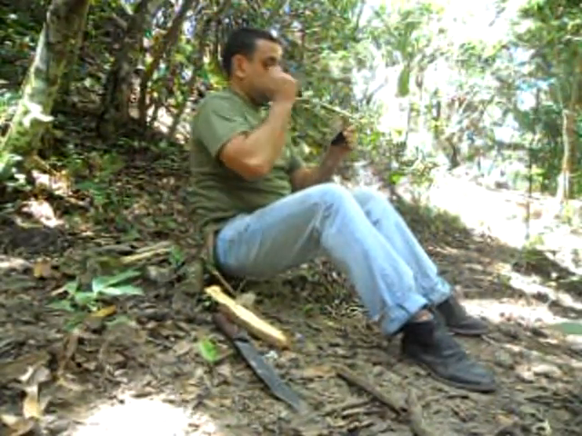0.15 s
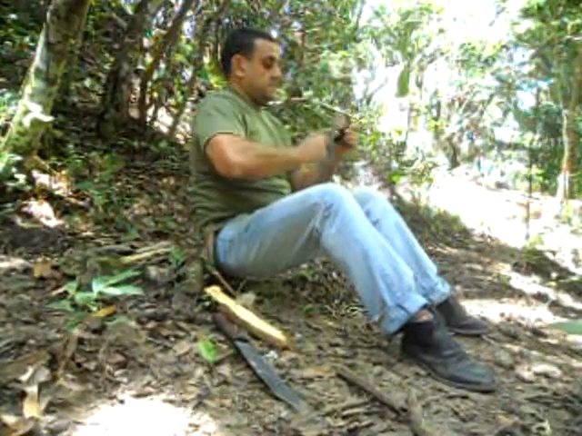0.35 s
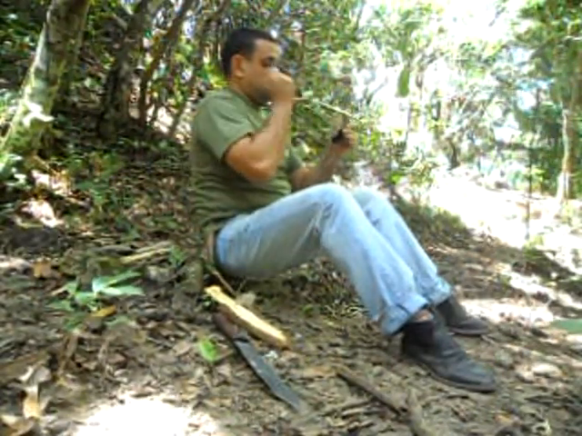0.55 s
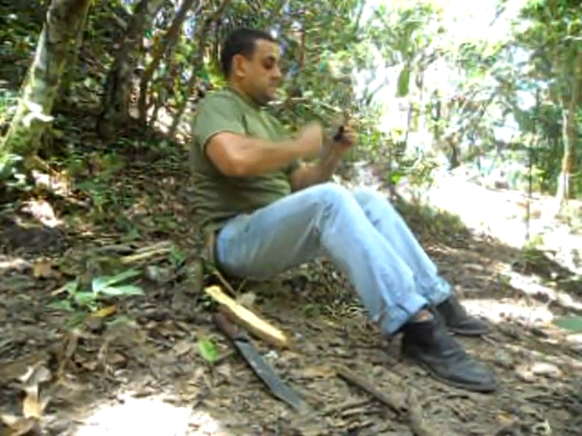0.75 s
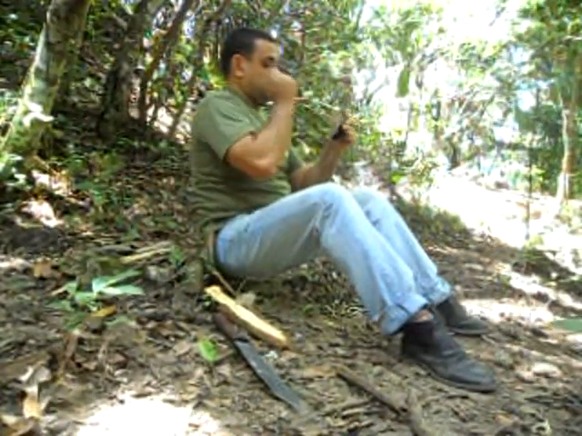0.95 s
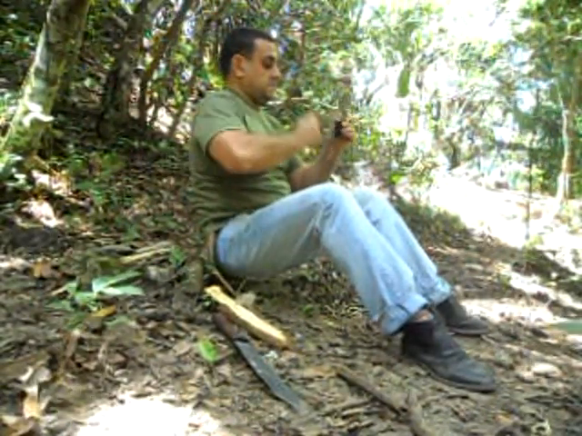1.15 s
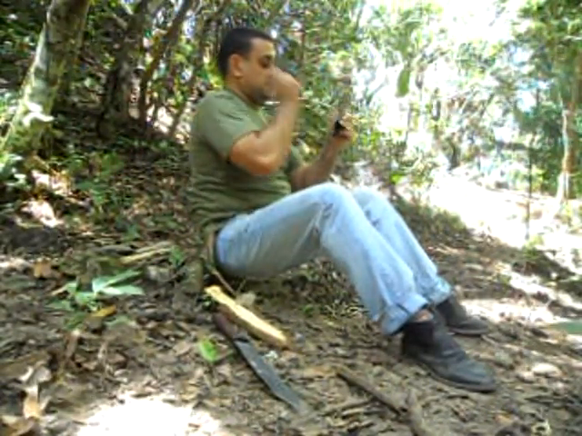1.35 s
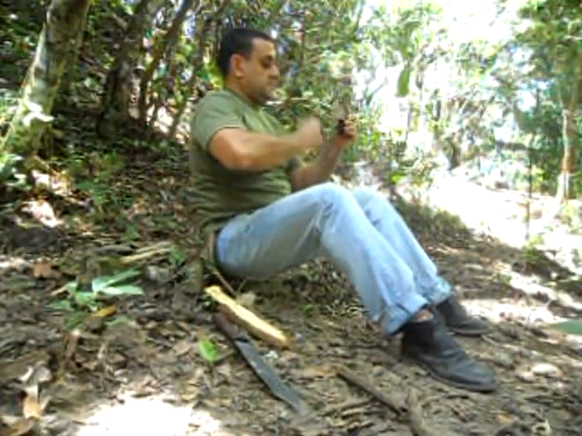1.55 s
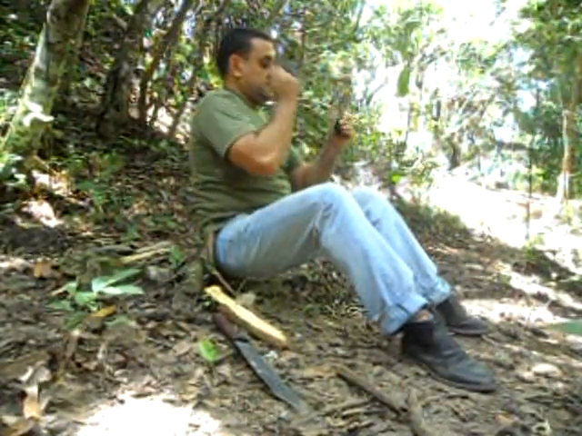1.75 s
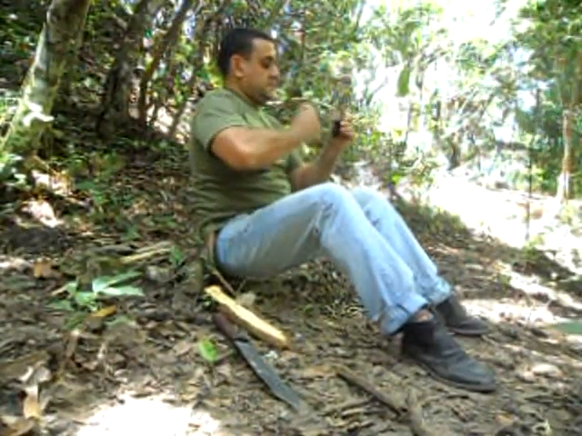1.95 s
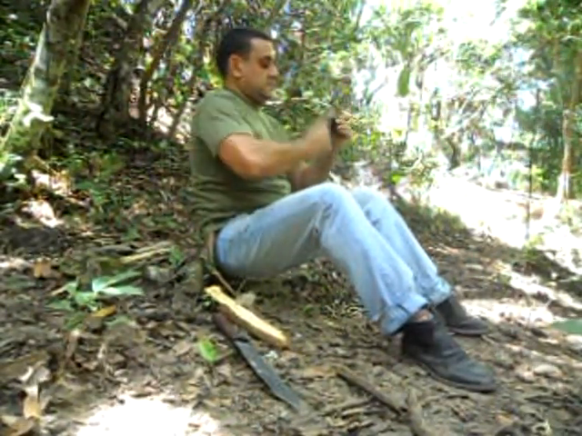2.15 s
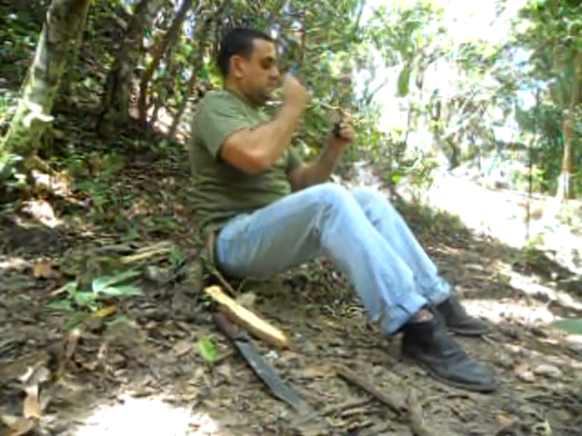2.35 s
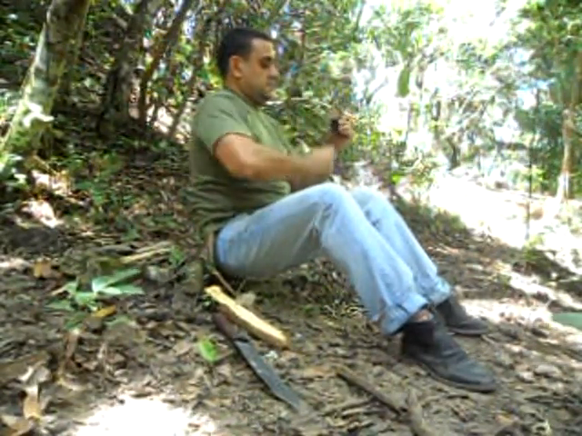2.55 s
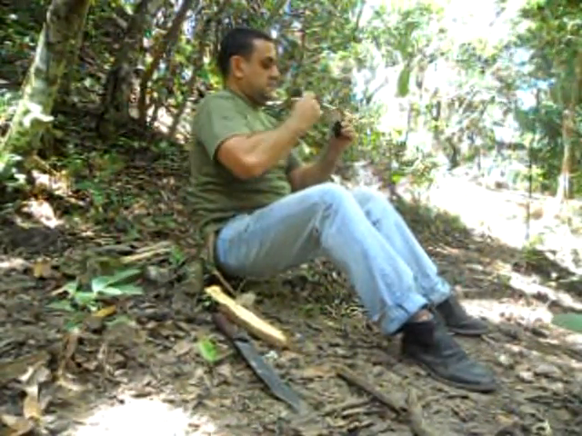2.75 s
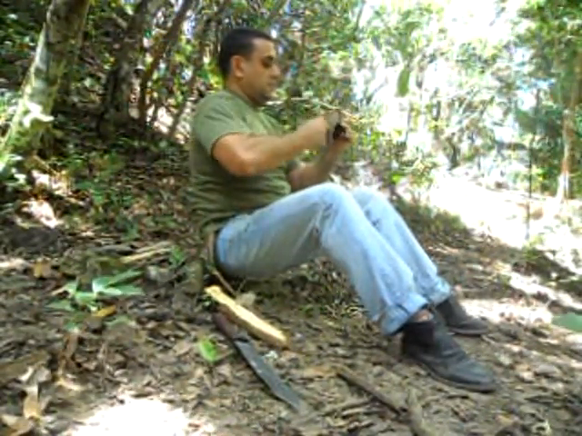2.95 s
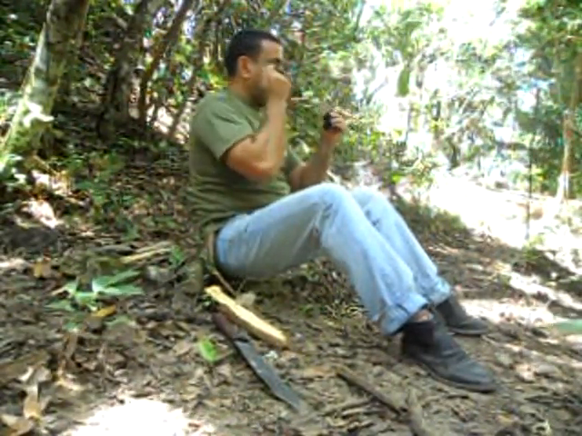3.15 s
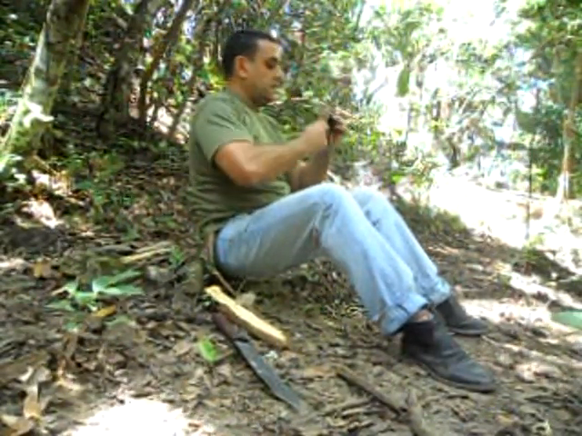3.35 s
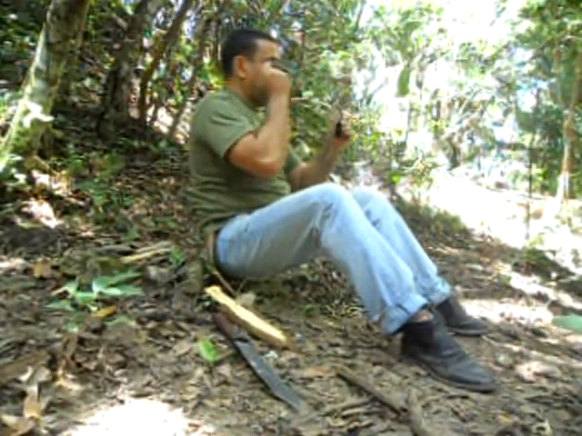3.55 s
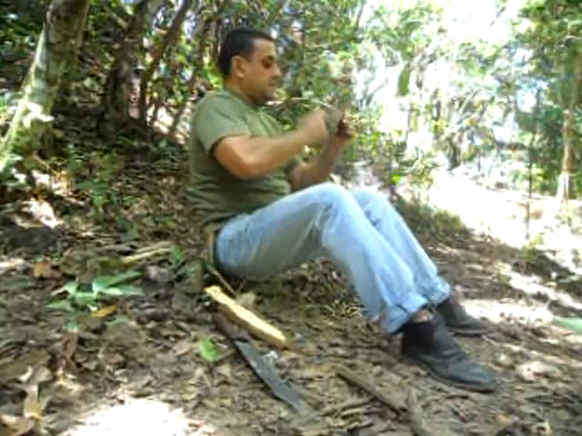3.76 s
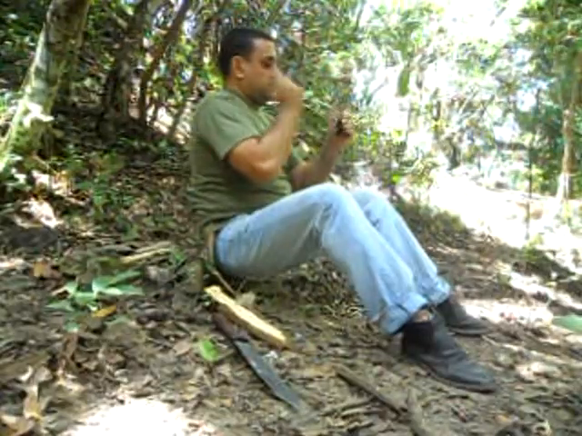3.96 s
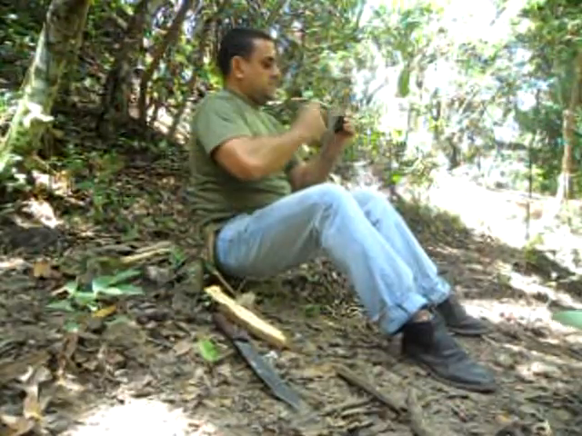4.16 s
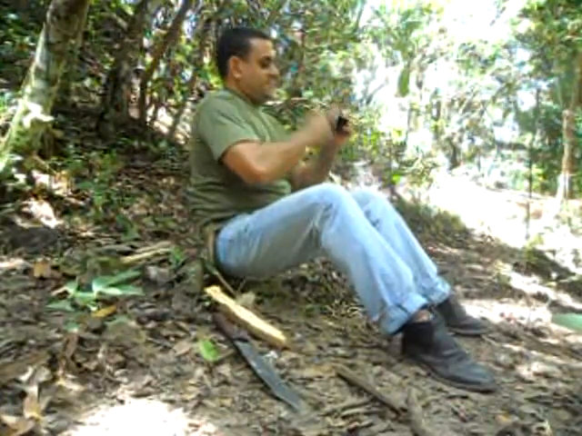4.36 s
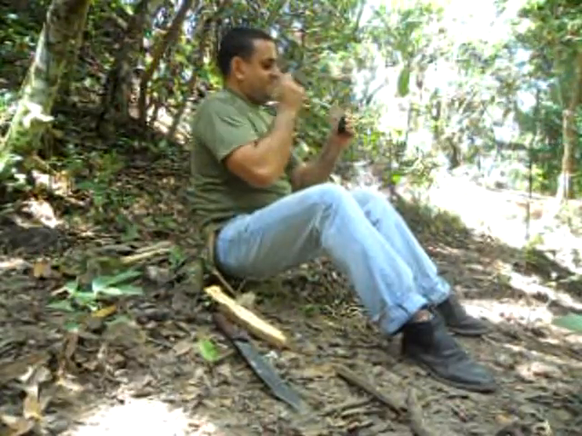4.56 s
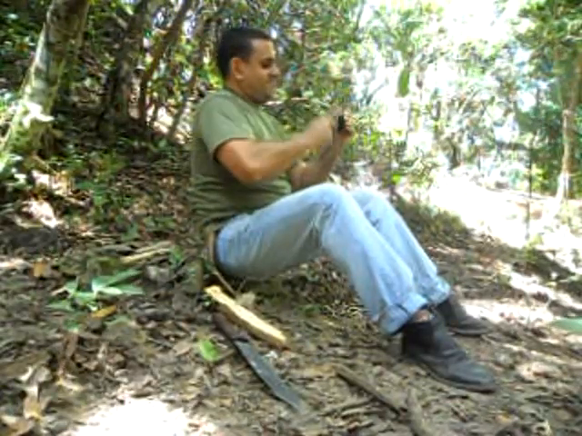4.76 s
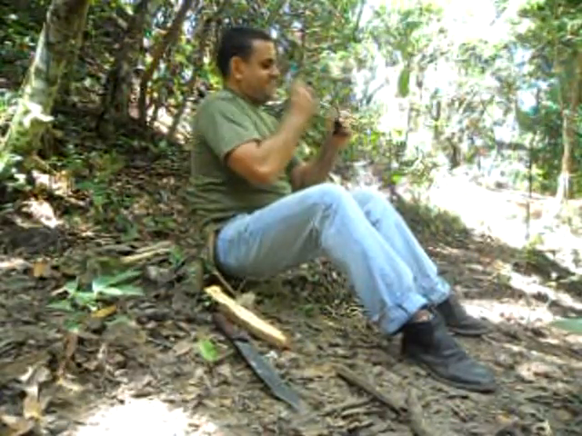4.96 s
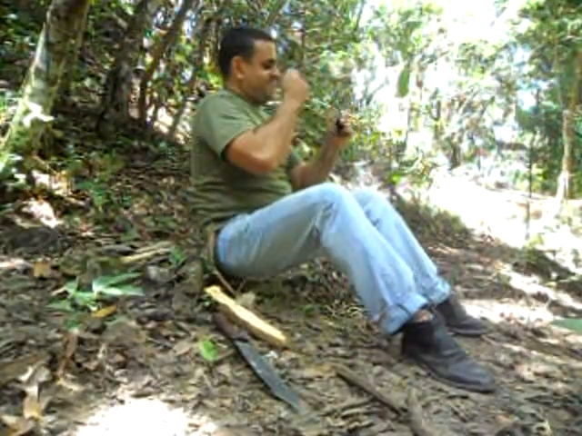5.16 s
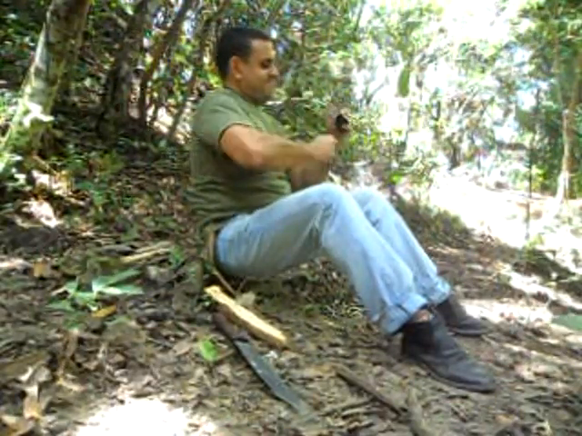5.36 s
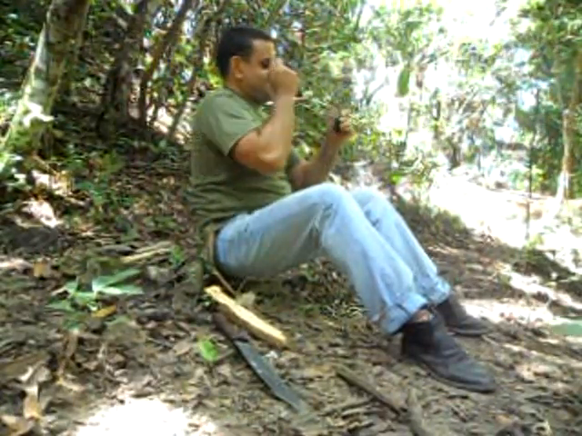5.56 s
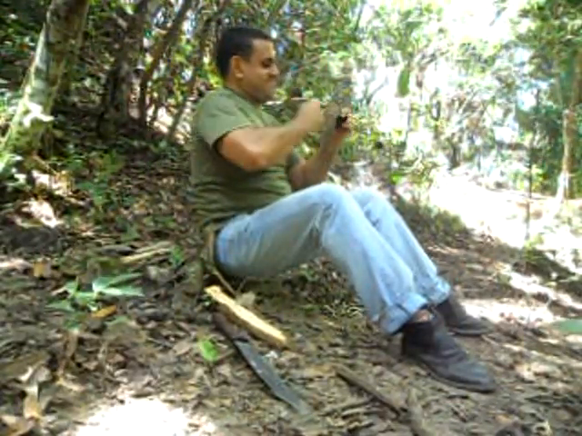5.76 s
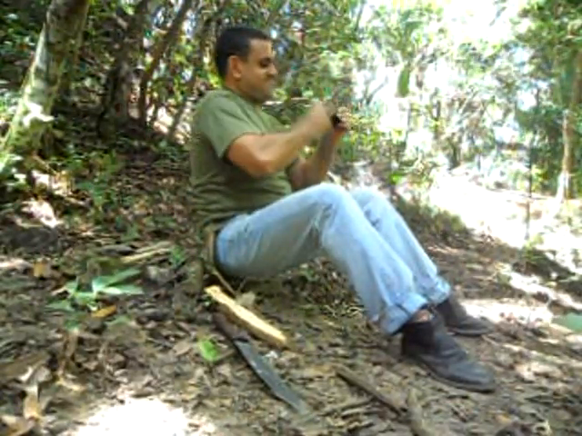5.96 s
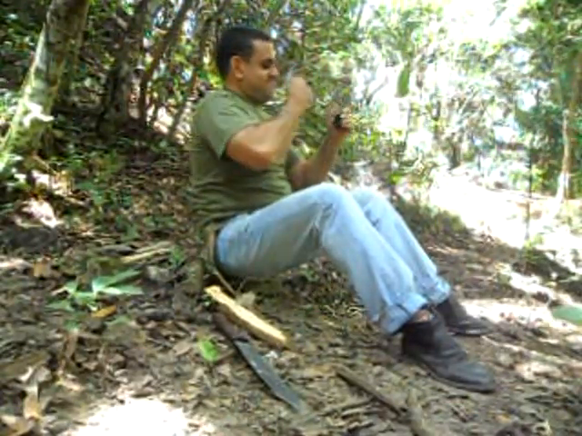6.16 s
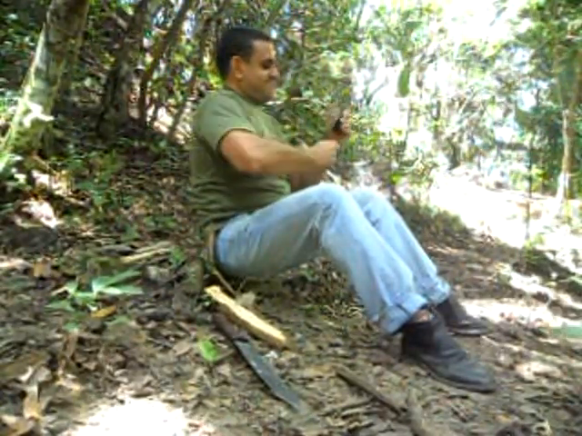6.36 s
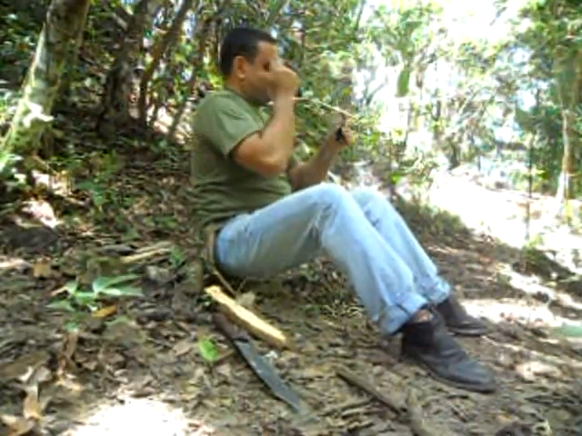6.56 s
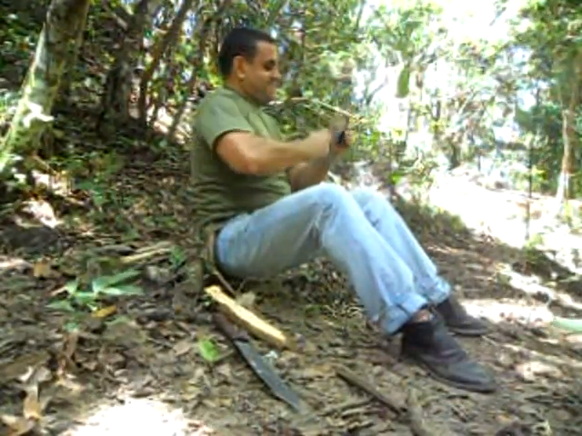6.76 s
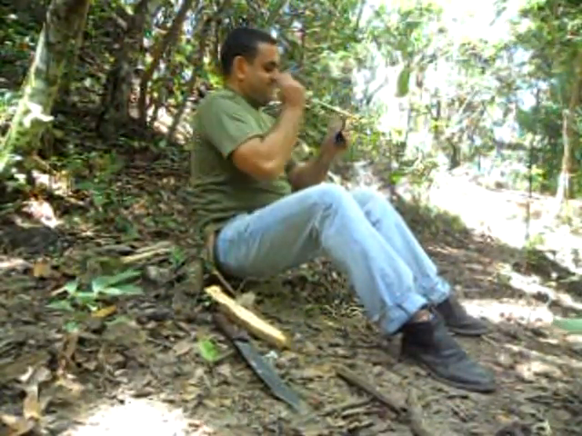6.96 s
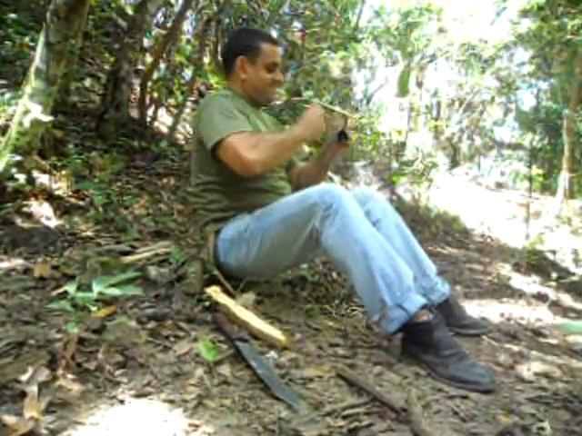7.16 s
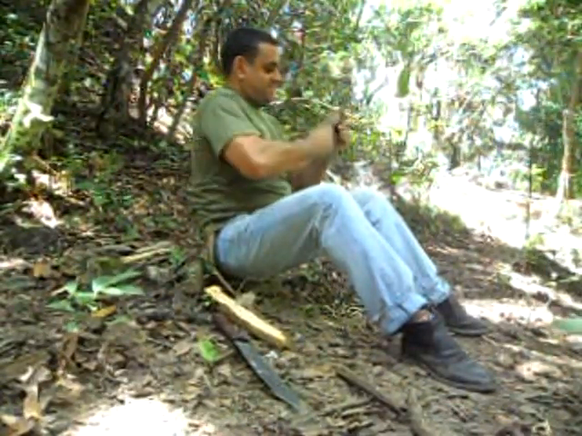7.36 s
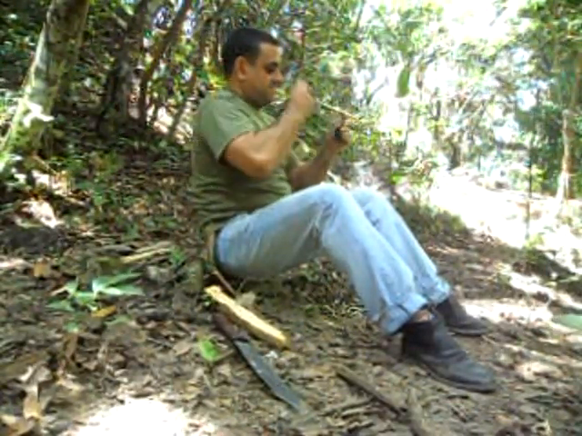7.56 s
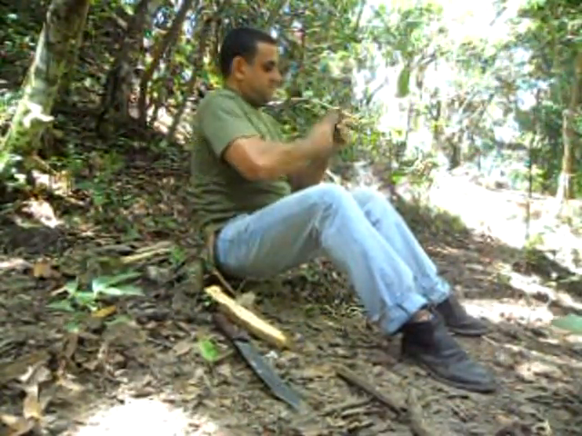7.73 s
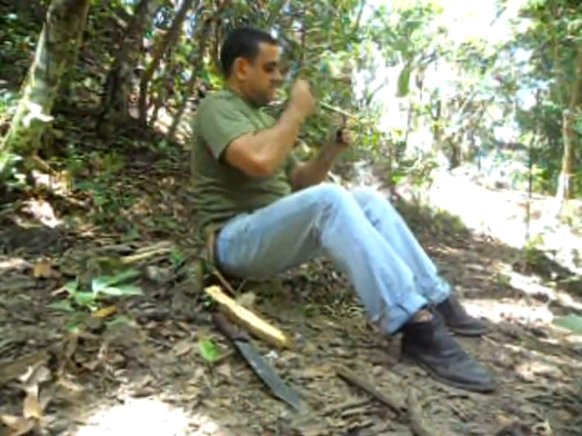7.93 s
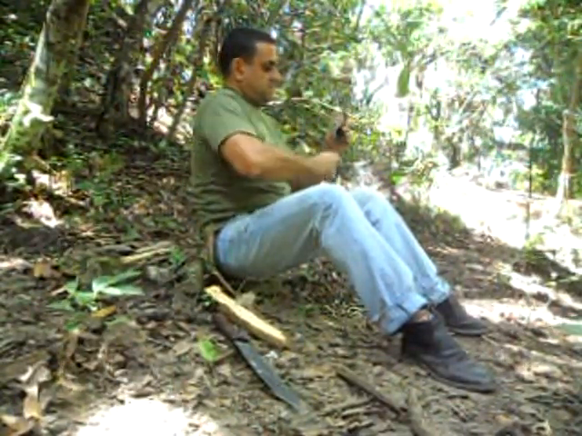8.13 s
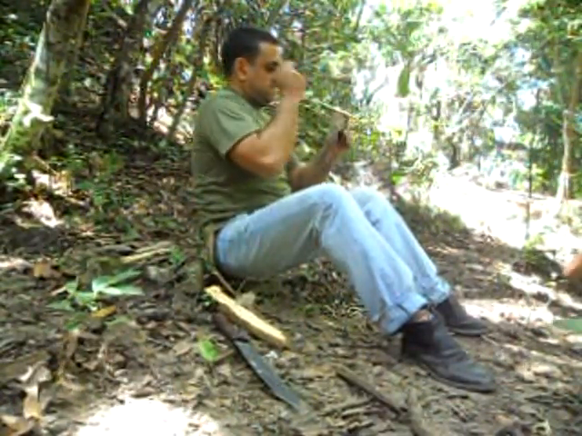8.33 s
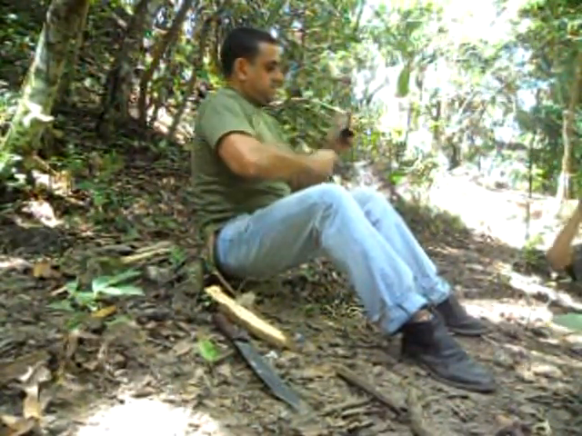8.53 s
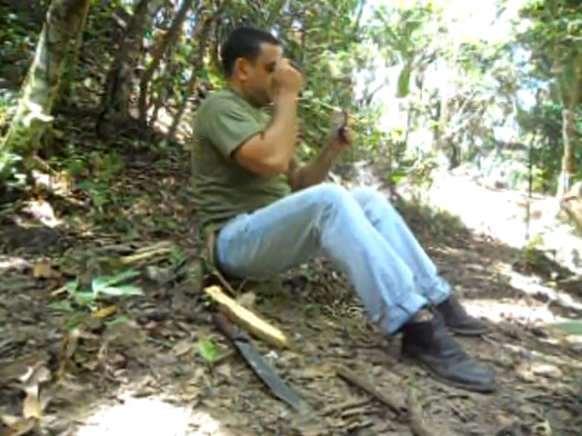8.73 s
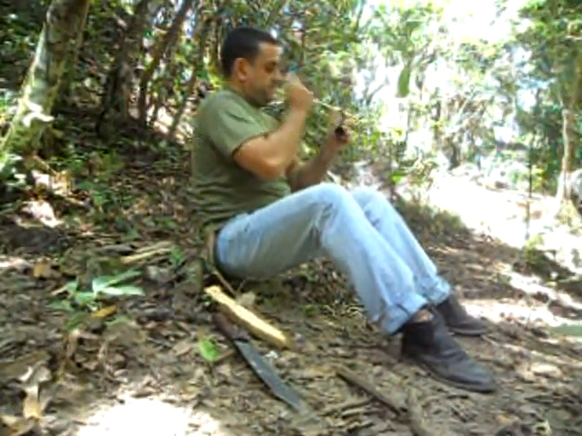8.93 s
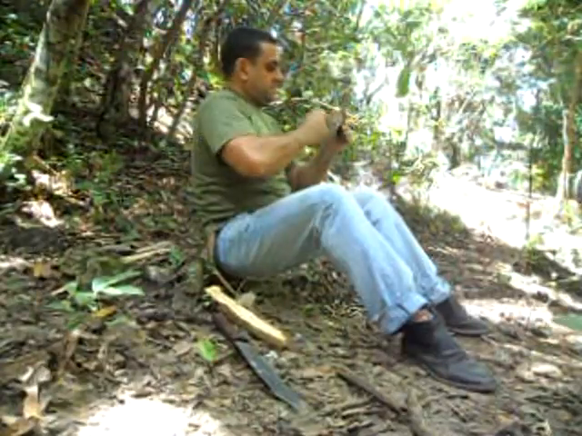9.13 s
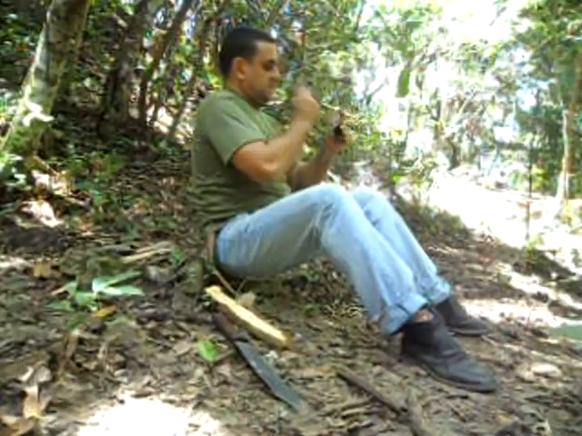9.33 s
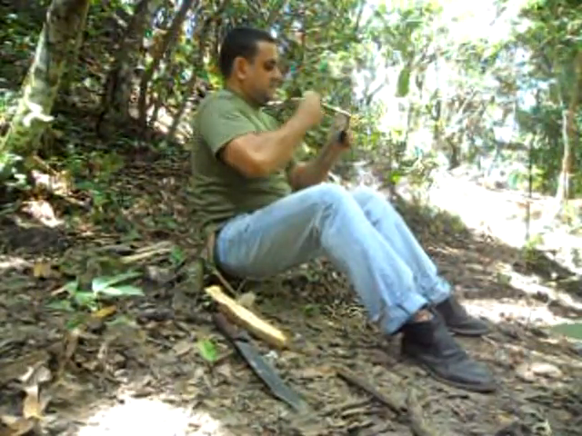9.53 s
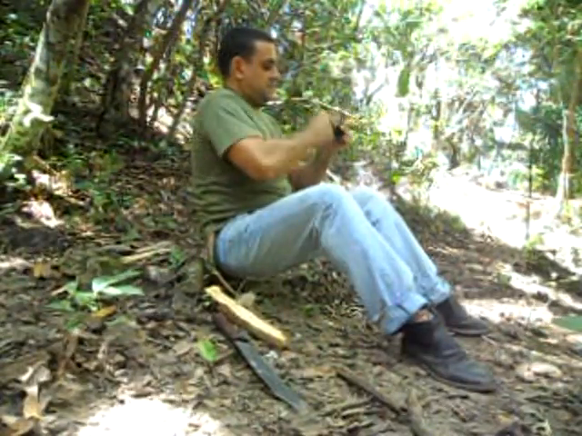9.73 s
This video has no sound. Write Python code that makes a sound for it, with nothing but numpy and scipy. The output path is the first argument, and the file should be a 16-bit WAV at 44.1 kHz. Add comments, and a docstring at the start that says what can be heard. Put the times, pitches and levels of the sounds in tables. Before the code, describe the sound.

A steel striker hits a hand-held flint outdoors in a forest, heard in mono from a short distance. From 0.2 s, firm clacks come every 0.35 to 0.4 s: hard, dry, midrange-bright, a few milliseconds of gritty scrape, a light second touch, and a faint short steel ring with thin scatter from trees. After the hit at 2.5 s there is a gap; from 3.3 s the clacks resume softer and change colour, varying in strength, very weak near 5.2 s. From about 7.1 s the tone shifts again and blows grow firmer, with a gap after 8.4 s and strong hits at 8.9, 9.3 and 9.7 s. Low wind rumble rises and falls, with rounded microphone thumps around 2.4, 3, 4.8, 6.1 and 8.8 s. Steady faint hiss throughout; a soft, barely audible sleeve swish near 8.9 s.

```python
"""A steel struck against a hand-held flint about three times a second, by a seated man in a forest.
Each blow is a modal clack, grain-noise scrapes, a light second touch and a faint banded steel ring.
Trees scatter it as fading noise. Wind is gust-driven band rumble plus rounded eddy swings at the microphone.
A steady shaped hiss lies under all; one sleeve swish of shaped noise comes late."""
import sys
import numpy as np
from scipy import signal
from scipy.fft import rfft, irfft, next_fast_len
from scipy.io import wavfile

SR = 44100
rng = np.random.default_rng(int(sys.argv[2]) if len(sys.argv) > 2 else 0)


def log_audio(samples):
    """Write samples as a 16-bit WAV file to the path given in sys.argv[1]."""
    # one column per channel
    frames = np.atleast_2d(samples).T
    # limit to full scale, then quantise
    limited = np.clip(frames, -1, 1)
    pcm = np.round(limited * 32767).astype(np.int16)
    wavfile.write(sys.argv[1], SR, pcm)


N = 436149
TIME_S = np.arange(N) / SR
BLOW_S = np.arange(SR // 3) / SR
CONTACT_S = np.arange(1024) / SR


def undb(db):
    """Decibels to amplitude gain."""
    return 10 ** (np.asarray(db) / 20)


def unit(x):
    """Scale to rms 1."""
    return x / np.sqrt(np.mean(x ** 2))


def add(track, start_s, sound):
    """Mix a sound into a track, cut at the track's end."""
    start = max(int(start_s * SR), 0)
    part = sound[:max(len(track) - start, 0)]
    track[start:start + len(part)] += part


def noise(points, size):
    """Noise of rms 1 with a spectrum of (hz, level_db) points."""
    hz, level_db = np.transpose(points)
    size_fft = next_fast_len(size)
    bins_hz = np.arange(size_fft // 2 + 1) * SR / size_fft
    gain = undb(np.interp(np.log(bins_hz + 1), np.log(hz), level_db))
    spectrum = rfft(rng.standard_normal(size_fft)) * gain
    return unit(irfft(spectrum, size_fft)[:size])


def swell(centre_s, length_s):
    """Bell-shaped rise and fall around a time."""
    return np.exp(-2 * ((TIME_S - centre_s) / length_s) ** 2)


# hiss spectrum: pitch_hz, density_db (relative, per Hz)
HISS_SPECTRUM = [(20, 3), (100, 0.5), (250, 1), (500, -0.5), (1000, -3.5), (2100, -7.5), (3200, -9),
                 (5000, -11), (8000, -13), (10300, -15)]


def hiss(level_db=-59.5):
    """Steady hiss: stationary shaped noise."""
    return undb(level_db) * noise(HISS_SPECTRUM, size=N)


# breeze at the microphone, with lulls: time_s, flow_db
BREEZE_FLOW = [(0, -47), (0.25, -56), (0.7, -64), (2.33, -63.5), (2.5, -50), (3.5, -47), (3.68, -61.5),
               (3.95, -47.5), (4.42, -59), (4.58, -53.5), (5.3, -49.5), (5.75, -65), (6.05, -53),
               (7.2, -49.5), (7.35, -72), (7.57, -47), (8.02, -48.5), (8.27, -67), (8.5, -43), (9.89, -49)]
# gusts, each with an eddy at its crest: crest_s, length_s, gust_db, eddy_db, eddy_hz
GUST_EDDIES = [(0.16, 0.11, -46.5, -37, 65), (1.866, 0.11, -52, -50, 70), (2.421, 0.033, -31.5, -26, 125),
               (2.549, .07, -42, -38, 100), (2.646, 0.018, -43, -35, 136), (2.95, 0.074, -41.5, -40, 109),
               (3.032, 0.038, -34.5, -30.5, 133), (3.091, 0.033, -36.5, -30, 154),
               (3.26, 0.079, -41.5, -42.5, 127), (3.868, .05, -44.5, -41.5, 100),
               (4.041, 0.047, -43, -29, 119), (4.56, 0.084, -40, -38.5, 129), (4.762, 0.098, -35, -24, 128),
               (5.892, .04, -42, -42, 91), (6.053, 0.073, -33.5, -25.5, 162), (6.111, 0.063, -36, -30, 104),
               (6.325, .13, -36, -30, 129), (6.58, .1, -41, -36, 115), (6.83, 0.03, -37.5, -41, 119),
               (7.233, 0.032, -39, -38, 125), (8.551, 0.055, -41, -33.5, 84), (8.798, 0.076, -36, -23, 125),
               (9.071, 0.085, -41, -37, 116)]
# rumble bands in a moderate gust: centre_hz, level_db, growth (dB per dB of gust)
RUMBLE_BANDS = [(19.9, -54, 0.72), (36, -55, 0.39), (63.7, -52.5, 1.1269), (99.9, -60.5, 1.44),
                (147, -69, 1.26), (239.5, -78, 1.7359), (384, -90, 1.73)]


def wind(moderate_db=-47, flutter_db=4.5, flutter_hz=17):
    """Gusts ride on the breeze and break into puffs; stronger wind sheds smaller eddies, so reaches higher."""
    flow = undb(np.interp(TIME_S, *np.transpose(BREEZE_FLOW)))
    for crest_s, length_s, gust_db, *_ in GUST_EDDIES:
        flow = np.maximum(flow, undb(gust_db) * swell(crest_s, length_s))
    puff_spectrum = [(flutter_hz / 4, -20), (flutter_hz / 2, 0), (flutter_hz, 0), (2 * flutter_hz, -80)]
    puffs = noise(puff_spectrum, size=N)
    gust_rel_db = 20 * np.log10(flow) - moderate_db + flutter_db * np.minimum(puffs, 1.5)
    out = 0
    for centre_hz, level_db, growth in RUMBLE_BANDS:
        sos = signal.butter(3, [centre_hz / 1.3, centre_hz * 1.3], "band", fs=SR, output="sos")
        band = unit(signal.sosfilt(sos, rng.standard_normal(N)))
        out = out + band * undb(level_db + growth * gust_rel_db)
    return out


def buffets(width_cycles=0.34, wake_db=-9, wake_stretch=2.2):
    """A passing eddy is one rounded pressure swing, about a cycle long, inside a slower, weaker one."""
    out = np.zeros(N)
    half_s = BLOW_S.mean()
    t = BLOW_S - half_s
    phases = rng.random((len(GUST_EDDIES), 2))
    for (crest_s, _, _, eddy_db, eddy_hz), turns in zip(GUST_EDDIES, phases):
        for hz, share_db, turn in zip([eddy_hz, eddy_hz / wake_stretch], [0, wake_db], turns):
            bell = np.exp(-.5 * (hz * t / width_cycles) ** 2)
            swing = np.cos(2 * np.pi * (hz * t + turn)) * bell
            add(out, crest_s - half_s, undb(eddy_db + share_db) * swing)
    return out


def resonance(bins_hz, centre_hz, width_hz):
    """Power response of a steep-sided resonance, 6 dB down at the edges of its width."""
    return (1 + (2 * (bins_hz - centre_hz) / width_hz) ** 2) ** -2


def colour(hz, bass_db, treble_db, top_db):
    """Tint in dB: a square blow adds knock below the main resonance, a sharp edge adds treble and top."""
    corners_hz = [1420, 1980, 2930, 4430, 5400, 6600]
    return np.interp(hz, corners_hz, [bass_db, 0, 0, treble_db, treble_db, top_db])


# short clack resonances of each blow as heard through the microphone:
# centre_hz, width_hz, grip1_db, grip2_db, grip3_db
CLACK_RESONANCES = [(367, 190, -24.5, -15, -19), (806, 235, -17, -14, -20.5), (1093, 250, -9, -8, -10.5),
                    (1422, 176, -12.5, -13, -14.5), (2172, 270, 0.5, -20, -18), (2255, 383, -7, 1.5, -0.5),
                    (2476, 330, 2, -7.5, -3), (2930, 300, -6.5, -13.5, -21), (3410, 340, -19.5, -9, -11.5),
                    (3680, 310, -10.5, -30, -42.5), (4360, 740, -32, -14, -21),
                    (4610, 830, -13, -14.5, -15), (5050, 510, -10.5, -15.5, -19),
                    (5730, 1300, -22, -22.5, -22), (6715, 410, -14.5, -18.5, -17.5),
                    (8270, 1560, -25, -27.5, -32), (9000, 1360, -45, -36.5, -36)]


def clack(grip, tint, size_db=12.0, detune=0.013, scatter_db=1.0):
    """Impulse response of one contact; resonances shift a little from draw to draw."""
    bins_hz = np.arange(len(CONTACT_S) // 2 + 1) * SR / len(CONTACT_S)
    power = 1e-9  # keeps the logarithm finite
    draws = rng.standard_normal((len(CLACK_RESONANCES), 2))
    for (centre_hz, width_hz, *grip_db), (shift, swing) in zip(CLACK_RESONANCES, draws):
        mode_gain = undb(grip_db[grip] + scatter_db * swing)
        power = power + mode_gain ** 2 * resonance(bins_hz, centre_hz * (1 + detune * shift), width_hz)
    gain = unit(np.sqrt(power)) * undb(size_db + colour(bins_hz, *tint))
    # minimum phase: all ringing follows the contact
    cepstrum = irfft(np.log(gain))
    cepstrum[1:len(bins_hz) - 1] *= 2
    cepstrum[len(bins_hz):] = 0
    return irfft(np.exp(rfft(cepstrum)))


def scrape(response, start_s, fade_s, above_hz, grain_db=4):
    """Flint edge shaves the steel: a dying burst of tiny contacts rings the high-passed response."""
    grains = rng.standard_normal(len(CONTACT_S)) * undb(grain_db * rng.standard_normal(len(CONTACT_S)))
    burst = grains * (CONTACT_S > start_s) * np.exp(-CONTACT_S / fade_s)
    ring = signal.sosfilt(signal.butter(2, above_hz, "high", fs=SR, output="sos"), response)
    sound = signal.fftconvolve(burst, ring)
    return sound * np.linalg.norm(ring) / np.linalg.norm(sound)  # same energy as the ring


# steel once free of the stone: centre_hz, width_hz, t60_s, grip1_db, grip2_db, grip3_db
FREE_STEEL_MODES = [(2090, 260, 0.33, -4, -5, -3), (2630, 760, 0.4, -1.5, -8, -4.5),
                    (3510, 210, 0.41, -7, -8, -7.5), (3945, 390, 0.26, 1.5, -5.5, -3),
                    (4610, 550, 0.36, -13, -6.5, -8.5), (6700, 290, 0.29, -8, -13, -1.5),
                    (8170, 300, 0.31, -7, -21, -16)]


def steel_ring(grip, tint, rise_s=0.0033):
    """Each mode arrives by many paths, as a narrow fading noise band; sharper blows wake the high ones."""
    bins_hz = np.arange(len(BLOW_S) // 2 + 1) * SR / len(BLOW_S)
    out = 0
    for centre_hz, width_hz, t60_s, *grip_db in FREE_STEEL_MODES:
        spectrum = rfft(rng.standard_normal(len(BLOW_S))) * np.sqrt(resonance(bins_hz, centre_hz, width_hz))
        band = unit(irfft(spectrum, len(BLOW_S)))
        level_db = grip_db[grip] + colour(centre_hz, *tint)
        out = out + band * undb(level_db - 60 * BLOW_S / t60_s)
    return out * (1 - np.exp(-BLOW_S / rise_s))


# scatter by trunks and leaves: pitch_hz, level_db
FOREST_SPECTRUM = [(300, -13.5), (1100, -6.5), (1600, -7), (2200, -1.5), (3100, -13.5), (4200, -15.5),
                   (6000, -16), (10000, -28)]


def forest(early_db=-34, early_t60_s=0.088, late_db=-44, late_t60_s=0.56, rise_s=0.0014):
    """Quick scatter from the ground and nearby leaves, then a thin tail from the trunks."""
    early = undb(early_db - 60 * BLOW_S / early_t60_s)
    late = undb(late_db - 60 * BLOW_S / late_t60_s)
    return noise(FOREST_SPECTRUM, size=len(BLOW_S)) * (early + late) * (1 - np.exp(-BLOW_S / rise_s))


# blows: start_s, level_db, bass_db, treble_db, top_db, scrape_db, touch_delay_ms, touch_db
BLOWS = [(0.213, -14.5, -1, -6, -7.5, -4, 9.5, -29), (0.5865, -12, 0, 0, -5, -5.5, 11, -25),
         (0.9658, -11.5, -4, -2.5, -3, -4.5, 11.2, -31), (1.3435, -11.5, -2.5, -2.5, -4.5, -2.5, 13, -19),
         (1.7535, -12, -1.5, 1, -2, -11.5, 7.9, -20), (2.1046, -13, -0.5, -12, -14, -6, 9.3, -27),
         (2.4795, -12, -5, -1, -4, -6, 11, -26), (3.264, -26, -0.5, -12, -7, -7, 6.1, -20),
         (3.6022, -21, -2, 2, -1.5, -7, 13, -15.5), (3.9577, -19, -3, -4.5, -7, -6.5, 10.5, -8.5),
         (4.3089, -14, -10.5, 3.5, 5, -9.5, 7.3, -11.5), (4.6192, -15.5, -5.5, 4.5, 3.5, -8, 12, -19),
         (4.9351, -20, 1, -0.5, -2, -12, 8.6, -22), (5.2396, -30.5, 8, -5, -4, -2, 7.9, -21),
         (5.5636, -18.5, 0.5, -3, -2.5, -7.5, 7.1, -7.5), (5.9028, -14.5, -3.5, -2.5, -8.5, -8, 12, -21),
         (6.27, -17, 2.5, -1, 0.5, -8, 3.4, -12), (6.6138, -20.5, 4, -9.5, 0.5, -5.5, 11, -20),
         (6.9704, -17, -0.5, -5.5, -1.5, -12.5, 10, -13), (7.3102, -12.5, 0.5, -2, -6, -10, 10.4, -8),
         (7.6748, -12.5, 3, -1.5, -2.5, -6.5, 10, -22), (8.0338, -17.5, 4.5, 0, -4.5, -11.5, 9.7, -13.5),
         (8.3913, -11.5, 4.5, 4.5, 4.5, -8.5, 7.3, -17), (8.9109, -14, -4, -5.5, -9.5, -11.5, 9.3, -12),
         (9.2959, -11, 3.5, 0.5, 2, -10, 9.7, -14), (9.6693, -10.5, 1.5, -0.5, -0.5, -9, 10, -21)]
# hands take a new grip, which changes the clack's colour: time_s
NEW_GRIP_S = [3.0, 7.1]
# edge drag, one row per grip: scrape_start_s, scrape_fade_s
EDGE_DRAG = [(.0009, 0.0016), (.0018, 0.0039), (.0023, .0028)]
# steel ring, one value per grip: level_db (against the blow)
STEEL_RING_DB = [-41, -37, -40.5]


def strikes(contact_db=-1.5, contact_treble_db=0.5, bite_db=2.0, scraping_db=2.0):
    """Every blow: slightly brighter first contact, bite of the edge, scrape, second touch, ring, scatter."""
    out = np.zeros(N)
    for start_s, level_db, *tint, scrape_db, touch_delay_ms, touch_db in BLOWS:
        grip = np.searchsorted(NEW_GRIP_S, start_s)
        edge = clack(grip, tint)
        contact = clack(grip, np.array(tint) + [0, contact_treble_db, contact_treble_db])
        blow = forest() + undb(STEEL_RING_DB[grip]) * steel_ring(grip, tint)
        add(blow, 0, undb(contact_db) * contact)
        # the edge crumbles as it bites, drawing the treble out over a few ms
        bite = scrape(edge, start_s=.0001, fade_s=0.0013, above_hz=4560)
        add(blow, 0, undb(bite_db) * bite)
        drag = scrape(edge, *EDGE_DRAG[grip], above_hz=320)
        add(blow, 0, undb(scrape_db + scraping_db) * drag)
        touch = scrape(contact, start_s=0, fade_s=0.00088, above_hz=840)
        add(blow, touch_delay_ms / 1000, undb(touch_db) * touch)
        add(out, start_s, undb(level_db) * blow)
    return out


# sleeve brush on a downstroke: centre_s, length_s, level_db
SLEEVE_SWISH = (8.86, 0.11, -60)
# cloth spectrum: pitch_hz, level_db
CLOTH_SPECTRUM = [(200, -17), (650, 4), (1200, -2), (2000, -13), (5000, -24), (10000, -40)]


def sleeve():
    """Soft swish of cloth as the arm comes down: shaped noise under a bell envelope."""
    centre_s, length_s, level_db = SLEEVE_SWISH
    return undb(level_db) * swell(centre_s, length_s) * noise(CLOTH_SPECTRUM, size=N)


def scene():
    """Hiss, wind, buffets, strikes and sleeve on one channel."""
    return (hiss() + wind() + buffets() + strikes() + sleeve())[None]


def record(dry, top_hz=10600):
    """Steep elliptic low-pass removes the top octave."""
    return signal.sosfilt(signal.ellip(8, .3, 60, top_hz, fs=SR, output="sos"), dry)


dry = scene()
out = record(dry)
log_audio(out)
```